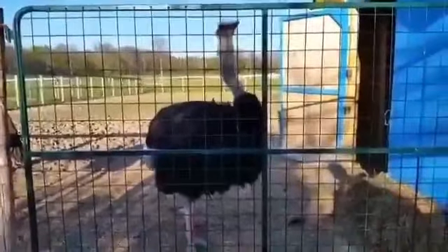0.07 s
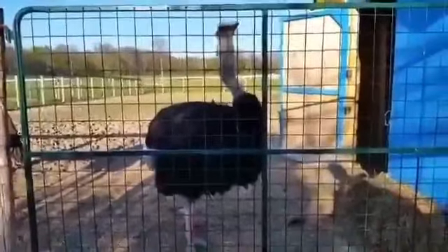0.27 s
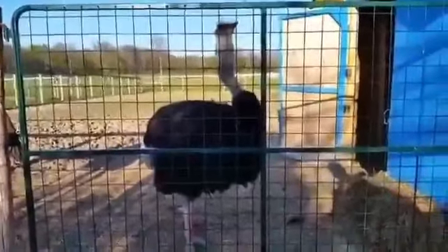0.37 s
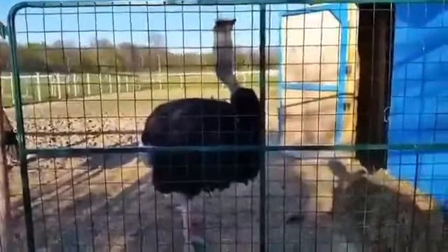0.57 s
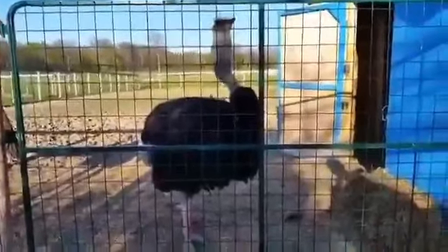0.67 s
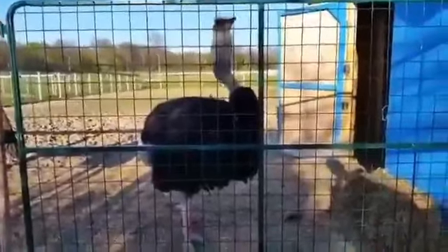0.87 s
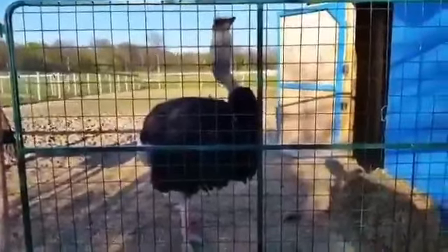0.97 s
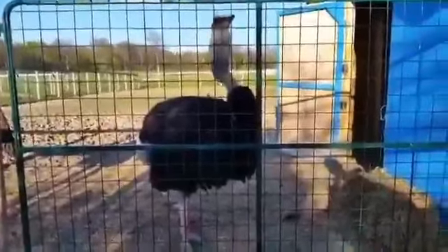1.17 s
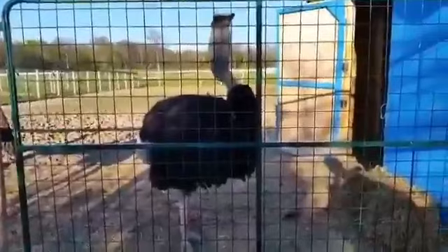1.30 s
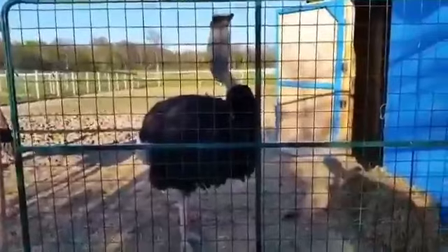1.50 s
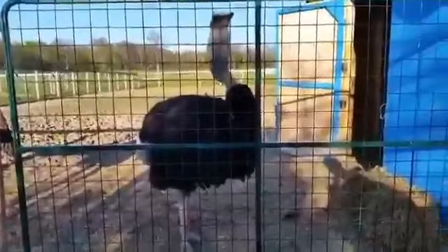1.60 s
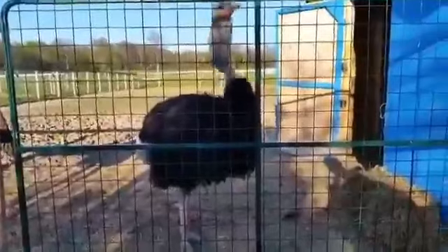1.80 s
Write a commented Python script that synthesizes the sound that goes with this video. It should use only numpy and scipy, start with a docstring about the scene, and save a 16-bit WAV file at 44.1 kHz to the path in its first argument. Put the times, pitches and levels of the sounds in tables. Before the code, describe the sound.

Outdoors, an ostrich's call catches briefly, swells into a low, smooth hoot, then slides down and ends creaky. Around it are faint wind rumble, a soft hiss, a far machine hum and a few dull bumps.

```python
"""Light wind, a soft hiss, a far machine hum and a dull thump are heard in an open pen.
Then a male ostrich booms once, beak shut and neck blown up like a balloon. The voice catches with
a few loose flaps, rises to a near-pure hoot and sinks two octaves, so that one harmonic after
another passes through the neck's resonance. It turns creaky as it runs out."""
import sys
import numpy as np
from scipy import signal
from scipy.fft import rfft, irfft, next_fast_len
from scipy.io import wavfile

SR = 44100
rng = np.random.default_rng(int(sys.argv[2]) if len(sys.argv) > 2 else 0)


def inscribe(sig):
    """Save sig as 16-bit PCM at rate SR to the path in sys.argv[1].

    A 1-D sig is mono; a 2-D sig holds one channel per row.
    Samples are clipped to [-1, 1] before scaling.
    """
    pcm = np.round(np.clip(np.atleast_2d(sig).T, -1, 1) * 32767)
    wavfile.write(sys.argv[1], SR, pcm.astype(np.int16))


N = 81585
TIME = np.arange(N) / SR


def from_db(db):
    """Amplitude grows tenfold for every 20 dB."""
    return 10 ** (np.asarray(db) / 20)


def unit_rms(x):
    """Dividing by the root mean square gives unit power."""
    return x / np.sqrt(np.mean(x ** 2) + 1e-20)


def in_time(rows):
    """Linear interpolation gives a curve its value at every sample."""
    return np.interp(TIME, *np.transpose(rows))


def at_hz(spectrum, hz):
    """Interpolation along log frequency gives a spectrum's level in dB."""
    freqs, db = np.transpose(spectrum)
    return np.interp(np.log(hz + 1), np.log(freqs), db)


def drift(rate_hz):
    """Low-pass filtering turns white noise into a slow fluctuation of unit spread."""
    step, settle = 40, 2000
    pole = np.exp(-2 * np.pi * step * rate_hz / SR)
    white = rng.standard_normal(N // step + settle + 2)
    slow = signal.lfilter([1], [1, -2 * pole, pole * pole], white)[settle:]
    return np.interp(np.arange(N) / step, np.arange(len(slow)), unit_rms(slow))


def noise(spectrum):
    """Spectral shaping colours noise of unit power; it rolls off above the last row."""
    size = next_fast_len(N, True)
    hz = np.fft.rfftfreq(size, 1 / SR)
    gain = from_db(at_hz(spectrum, hz)) / np.maximum(1, hz / spectrum[-1][0]) ** 2
    return unit_rms(irfft(rfft(rng.standard_normal(size)) * gain, size)[:N])


# Colour of the wind. Each row: frequency in Hz, relative spectral density in dB.
WIND_SPECTRUM = [(20, -3), (40, -9.5), (65, 1), (100, -1.5), (150, -7.5), (230, -13), (320, -23),
                 (500, -36)]
# Swell of the wind. Each row: time in seconds, level in dB.
WIND_ENVELOPE = [(0, -36.5), (.15, -35.5), (.25, -32.5), (.42, -31.5), (.62, -28), (.76, -37), (.93, -35),
                 (1.08, -34.5), (1.24, -30), (1.38, -35), (1.6, -37.5), (1.85, -46)]


def wind():
    """Random amplitude modulation makes the wind's low rumble lumpy."""
    return from_db(in_time(WIND_ENVELOPE) + 2.1 * drift(16)) * noise(WIND_SPECTRUM)


# Colour of the open air. Each row: frequency in Hz, relative spectral density in dB.
AIR_SPECTRUM = [(100, 5), (300, 3.5), (500, -2), (750, -9), (1000, -5), (1250, -9.5), (1600, -12),
                (2200, -16), (3200, -21), (4800, -16), (5600, -24), (6400, -29.5), (7200, -43)]


def open_air(level_db=-49):
    """Stationary broadband noise forms the ambient floor."""
    return from_db(level_db) * noise(AIR_SPECTRUM)


# Colour of the hiss. Each row: frequency in Hz, relative spectral density in dB.
HISS_SPECTRUM = [(8500, -27.5), (9200, -5), (9600, 3.5), (10600, -4), (11800, 4.5), (13000, 1),
                 (14000, -3.5)]
# Swell of the hiss. Each row: time in seconds, level in dB.
HISS_ENVELOPE = [(0, -58.5), (.22, -61), (.27, -54), (.33, -61.5), (.42, -64.5), (.6, -61), (.72, -61.5),
                 (.93, -71), (1.1, -61.5), (1.45, -61.5), (1.6, -58.5), (1.85, -60)]


def hiss():
    """Noise concentrated in a high band is heard as a hiss."""
    return from_db(in_time(HISS_ENVELOPE)) * noise(HISS_SPECTRUM)


# Partials of the hum. Each row: harmonic number, level in dB.
HUM_HARMONICS = [(1, -55), (2, -60), (3, -69)]


def machine(hum_hz=502.2, waver=.004):
    """A far machine hums in a harmonic series, slightly modulated in pitch and level."""
    phase = 2 * np.pi * np.cumsum(hum_hz * (1 + waver * drift(20))) / SR
    return sum(from_db(db + 1.2 * drift(6.2)) * np.sqrt(2) * np.sin(k * phase)
               for k, db in HUM_HARMONICS)


# Low thumps. Each row: centre time in seconds, peak level in dB, frequency in Hz.
THUMP_PULSES = [(0.026, -14.5, 79), (0.236, -13.5, 75), (1.244, -21.5, 79), (1.756, -23, 72.2)]


def thumps(width_s=0.0083):
    """A Gaussian window cuts a low tone to a cycle or two, heard as a dull bump."""
    sound = np.zeros(N)
    for centre, db, hz in THUMP_PULSES:
        window = np.exp(-.5 * ((TIME - centre) / width_s) ** 2)
        sound -= from_db(db) * window * np.cos(2 * np.pi * hz * (TIME - centre))
    return sound


def ring(impulses, hz, t60):
    """A damped resonator answers each impulse with a sine that falls 60 dB in t60 seconds."""
    decay = from_db(-60 / (t60 * SR))
    angle = 2 * np.pi * hz / SR
    feedback = [1, -2 * decay * np.cos(angle), decay * decay]
    return signal.lfilter([0, np.sin(angle)], feedback, impulses + 1e-18)


# Loose flaps before the tone holds. Each row: start in seconds, relative level in dB.
FLAP_PULSES = [(.168, -24.5), (.183, -15.5), (.207, -11.5), (.220, -8), (0.237, -11)]
# Modes of the neck. Each row: frequency in Hz, gain in dB, time to fall 60 dB in seconds.
NECK_RESONANCES = [(207, 1, 0.11), (241, -15.5, 0.0623), (480, -32, 0.044), (682, -21, 0.061),
                   (1007, -22.5, 0.055)]


def flaps(cutoff_hz=471):
    """Impulse excitation: uneven pulses ring the neck's modes, softened by a low-pass filter."""
    impulses = np.zeros(N)
    for start, db in FLAP_PULSES:
        impulses[int(start * SR)] = from_db(db)
    ringing = sum(from_db(db) * ring(impulses, hz, t60) for hz, db, t60 in NECK_RESONANCES)
    return signal.sosfilt(signal.butter(2, cutoff_hz, fs=SR, output="sos"), ringing)


# Glide of the voice. Each row: time in seconds, fundamental frequency in Hz.
VOICE_PITCH = [(0.24, 157.2), (0.284, 190.6), (0.298, 196.7), (0.32, 203.9), (0.352, 207.2), (0.41, 200.8),
               (0.742, 164.1), (0.84, 157.6), (0.898, 153.6), (0.962, 151.8), (1.064, 139.7), (1.18, 122.4),
               (1.32, 101.7), (1.388, 96.7), (1.422, 94.68), (1.49, 82.76), (1.566, 77.3), (1.684, 66.6),
               (1.804, 52.85), (1.85, 50.4)]
# The fundamental. Each row: time in seconds, level in dB.
FUNDAMENTAL_ENVELOPE = [(.22, -62.5), (.245, -19), (.275, -12), (.305, -7), (.35, -9.5), (.45, -7.5),
                        (.49, -10), (.55, -9.7), (.6, -16.5), (.635, -22), (.675, -19.5), (.75, -10),
                        (.89, -4.5), (.98, -7.5), (1.04, -13), (1.075, -20.5), (1.1, -18.5), (1.14, -28),
                        (1.26, -25), (1.38, -30), (1.45, -40), (1.85, -36.5)]
# The second harmonic. Each row: time in seconds, level in dB.
SECOND_ENVELOPE = [(.22, -40), (.275, -35.5), (.3, -41.5), (.34, -34.5), (.41, -39.5), (.465, -46),
                   (.51, -33), (.6, -32.5), (.68, -39.5), (.79, -50.5), (.9, -37), (.99, -32), (1.06, -29),
                   (1.13, -20), (1.19, -20), (1.26, -23.5), (1.32, -21), (1.44, -19), (1.465, -26),
                   (1.485, -18.5), (1.56, -18), (1.62, -25), (1.69, -31.5), (1.76, -42.5), (1.85, -34)]
# Drive of the higher harmonics and the rasp. Each row: time in seconds, level in dB before colouring.
OVERTONE_DRIVE = [(.2, -63.5), (.26, -41.5), (.35, -42), (.48, -40.5), (.6, -40.5), (.66, -42.5),
                  (.73, -45.5), (.9, -48.5), (1.04, -51), (1.12, -52.5), (1.25, -54.5), (1.34, -64),
                  (1.44, -54), (1.52, -63), (1.7, -65), (1.78, -72), (1.85, -68)]
# The inflated neck's effect on the higher harmonics. Each row: frequency in Hz, gain in dB.
NECK_RESPONSE = [(100, 8), (160, 36), (205, 33), (265, 25), (310, 7), (370, -2.5), (470, -12.5),
                 (590, -5.5), (660, -4), (715, 1), (790, -6.5), (880, -11.5), (990, -5.5), (1100, -17.5),
                 (1200, -15), (1350, -25.5), (1600, -20.5), (1750, -31.5), (2020, -23), (2500, -38.5)]
# Colour of the air pulsing with the voice. Each row: frequency in Hz, relative spectral density in dB.
RASP_SPECTRUM = [(100, 1), (230, -1.5), (380, 6), (700, 3.5), (1000, 1.5), (1400, -19.5), (2000, -10),
                 (2800, -22), (5000, -27)]


def boom(start_s=.2, attack_s=0.0287, creak_from_s=1.4, creak_full_s=1.825, waver_db=4.5, rasp_db=-14):
    """Source and filter: harmonics glide through the neck's resonance; growing jitter makes a creak."""
    creak = np.clip((TIME - creak_from_s) / (creak_full_s - creak_from_s), 0, 1)
    jitter = .004 + 0.034 * creak  # fraction of the pitch
    shimmer_db = 0.5341 + 0.5 * creak
    hz = in_time(VOICE_PITCH) * (1 + jitter * drift(32))
    phase = 2 * np.pi * np.cumsum(hz) / SR
    tone = from_db(in_time(FUNDAMENTAL_ENVELOPE)) * np.cos(phase)
    tone += from_db(in_time(SECOND_ENVELOPE)) * np.cos(2 * phase)
    drive = from_db(in_time(OVERTONE_DRIVE))
    for k in range(3, 17):
        neck_gain = from_db(at_hz(NECK_RESPONSE, k * hz) + waver_db * drift(6.2))
        tone += drive * neck_gain * np.cos(k * phase + rng.uniform(0, 2 * np.pi))
    rasp = drive * from_db(rasp_db) * noise(RASP_SPECTRUM) * (1 + np.cos(phase))
    onset = np.clip((TIME - start_s) / attack_s, 0, 1)
    return onset * from_db(shimmer_db * drift(30)) * (np.sqrt(2) * tone + rasp)


def scene():
    """Superposition: the bird and its surroundings add in one channel."""
    return (boom() + flaps() + thumps() + machine() + wind() + open_air() + hiss())[None]


def record(dry, cutoff_hz=14200):
    """Band limiting: a steep low-pass filter removes the highest treble."""
    return signal.sosfilt(signal.ellip(10, .2, 80, cutoff_hz, fs=SR, output="sos"), dry)


dry = scene()
out = record(dry)
inscribe(out)
```